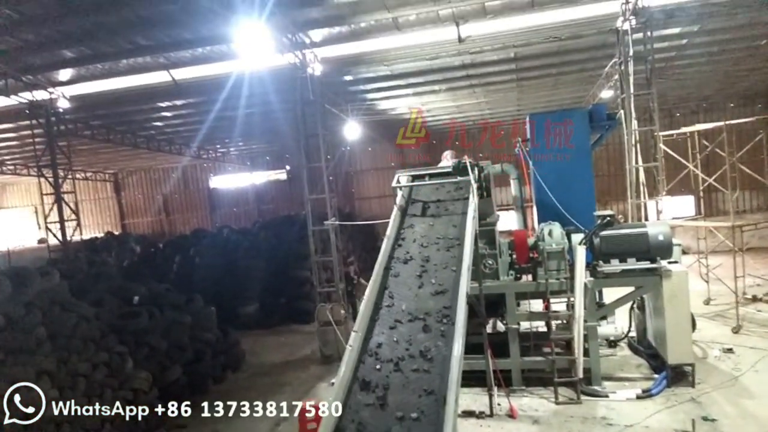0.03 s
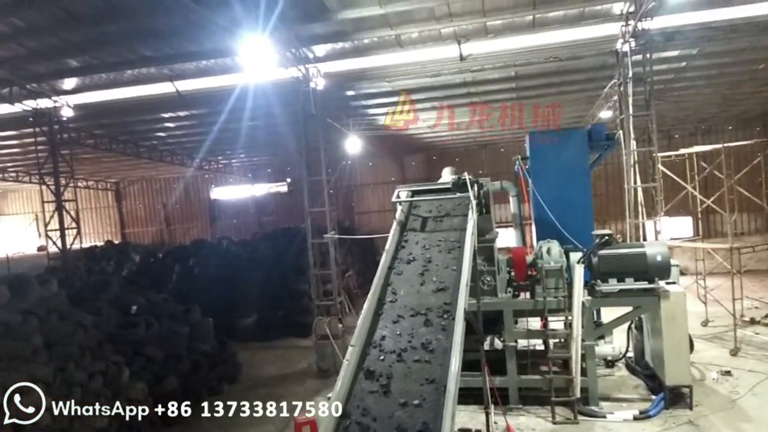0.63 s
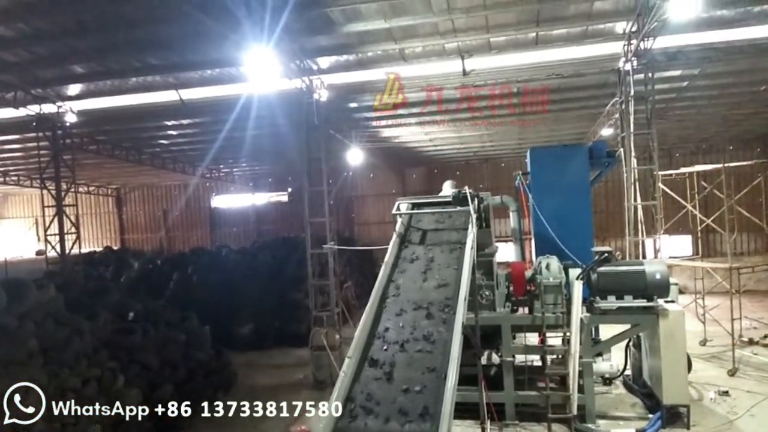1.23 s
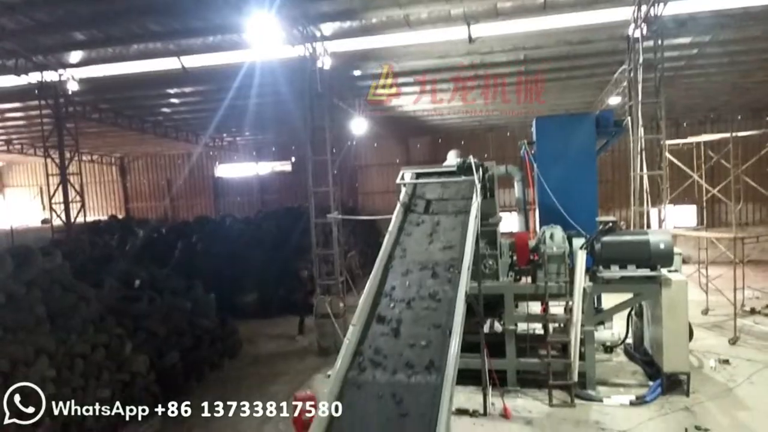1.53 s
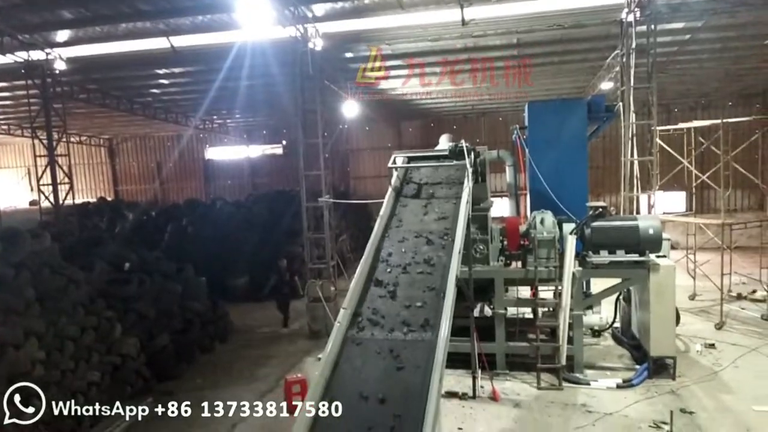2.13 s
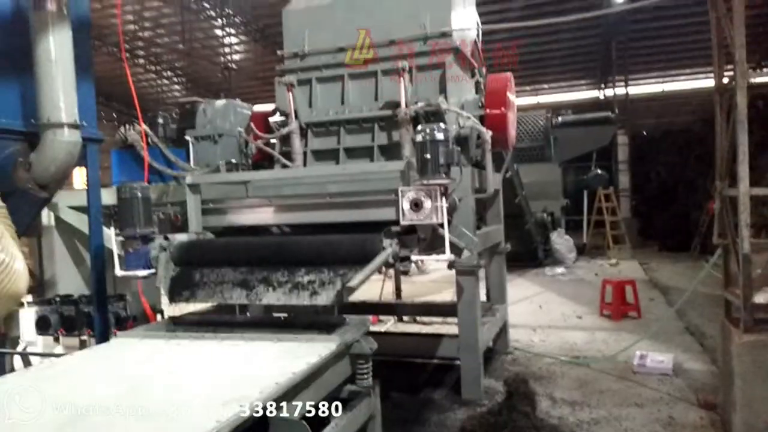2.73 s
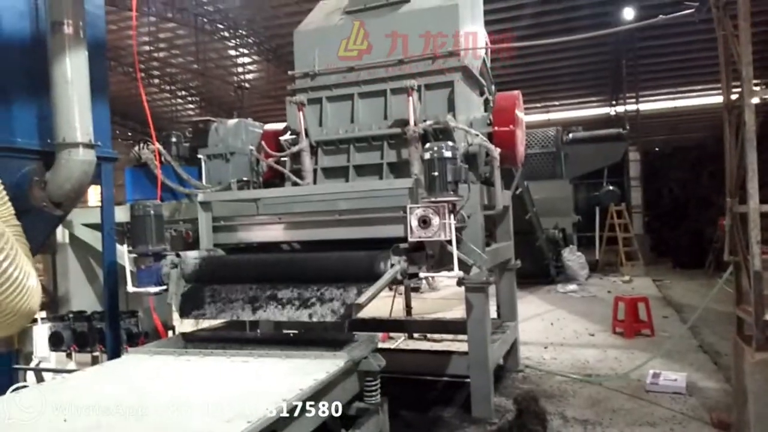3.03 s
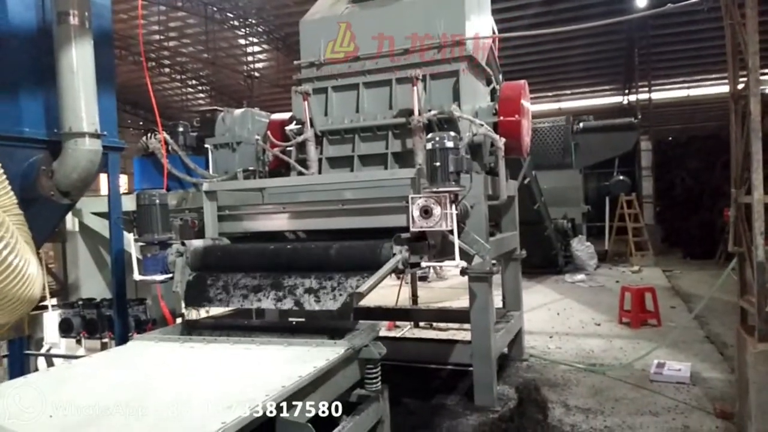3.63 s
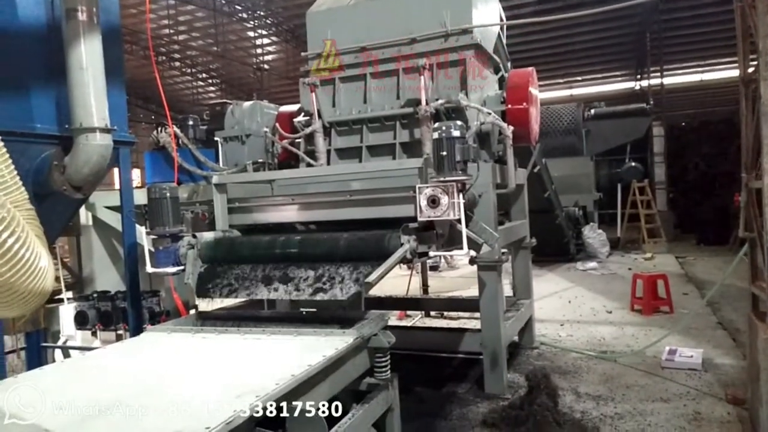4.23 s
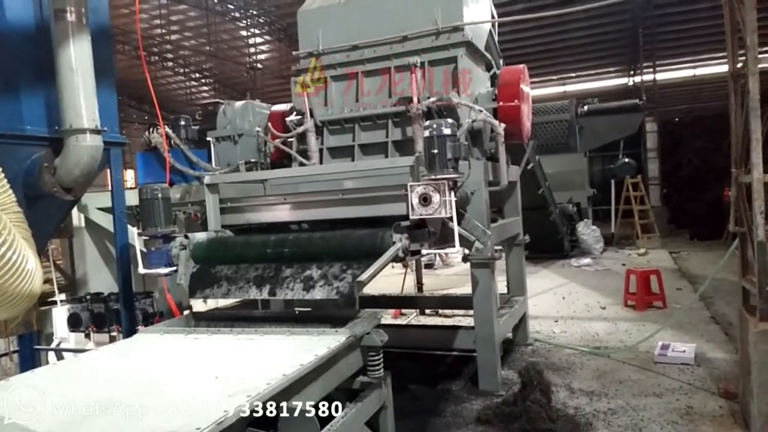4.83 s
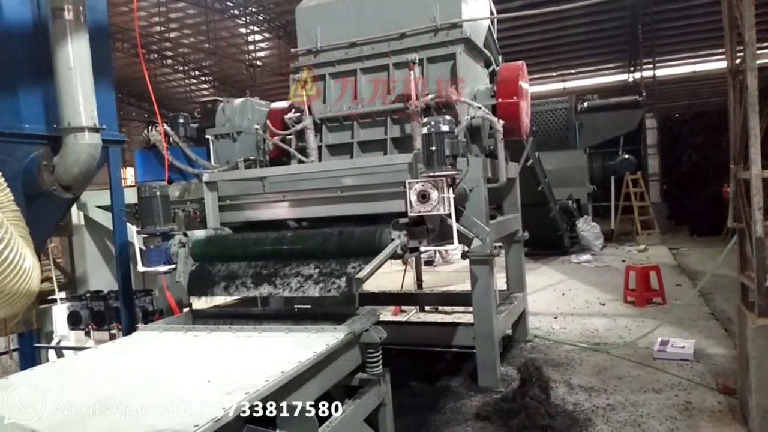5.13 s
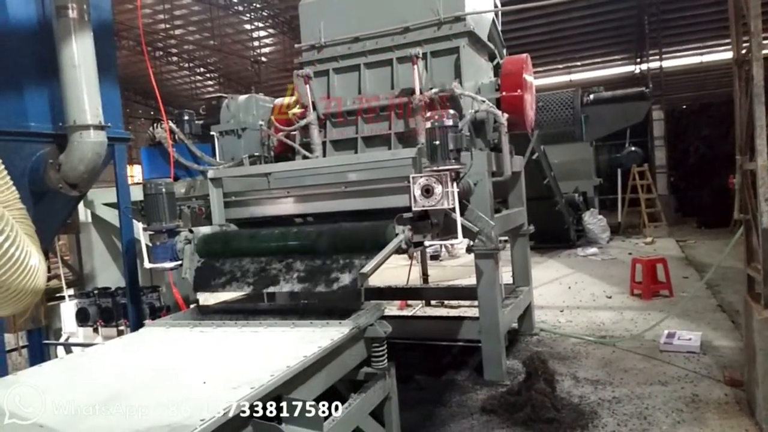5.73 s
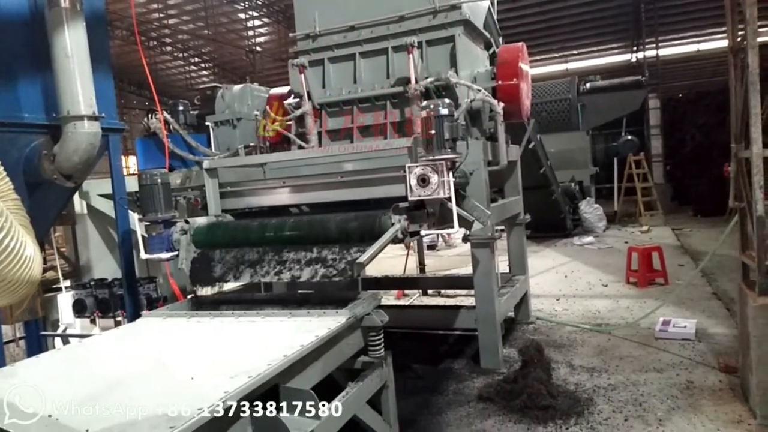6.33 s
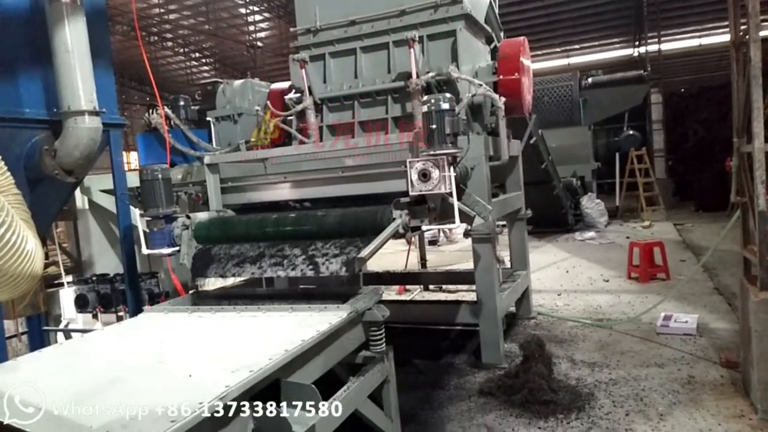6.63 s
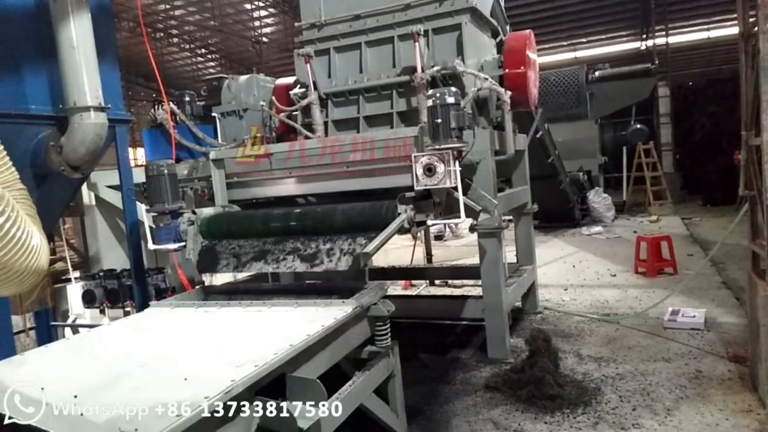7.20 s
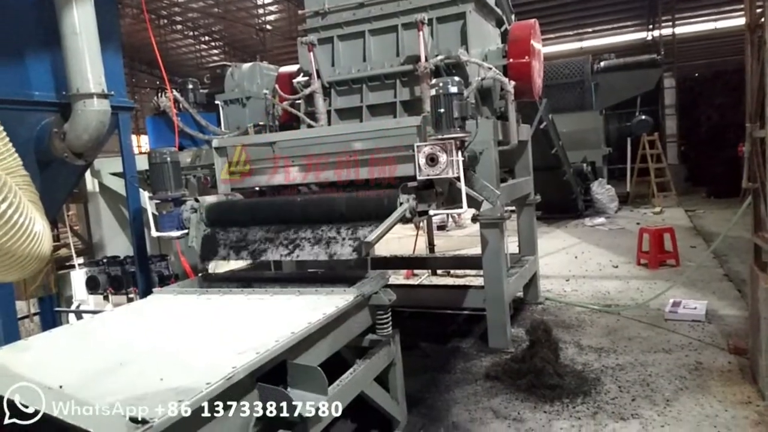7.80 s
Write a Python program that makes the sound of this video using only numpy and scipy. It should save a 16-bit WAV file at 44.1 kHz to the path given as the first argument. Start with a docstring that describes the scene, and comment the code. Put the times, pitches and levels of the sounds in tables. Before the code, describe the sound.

Heavy machinery shreds tires in a large metal shed. Beside the conveyor, a dense roar carries a throbbing hum and a steady fan and gear whine, with faint close rustles and two echoing metal clanks. The sound cuts to a brief silence, then fades back in at the granulator, where the roar continues with a deeper, pulsing hum and light ticks of crumbs hitting a screen.

```python
"""In a big sheet-metal shed a tyre-shredding line runs, heard first by the conveyor and then, after
a short silence and a fade-in, by the granulator. A three-knife rotor hums at harmonics of its shaft
and tears rubber, fed in surges: countless impacts merge into a roar that excites the modes of the
steel housings. A dust fan and gears whine, crumbs hiss and tick on the screen deck, short rustles
sound close by, and hard scraps clank on the chute and reverberate through the shed."""
import sys
import numpy as np
from scipy import signal
from scipy.fft import rfft, irfft
from scipy.io import wavfile

SR = 44100
rng = np.random.default_rng(int(sys.argv[2]) if len(sys.argv) > 2 else 0)


def generate_wav(sig):
    """Save sig (samples, or channels by samples) to the path in sys.argv[1] as 16-bit PCM at SR."""
    pcm = np.round(np.clip(np.atleast_2d(sig).T, -1, 1) * 32767).astype(np.int16)
    wavfile.write(sys.argv[1], SR, pcm)


N = 351036
T = np.arange(N) / SR
FREQ = np.arange(N // 2 + 1) * SR / N + 1e-3
SHAFT_HZ, KNIVES = 25.1, 3
CONVEYOR, GRANULATOR = 0, 1  # listening places


def undb(db):
    """Decibels to amplitude ratio."""
    return 10 ** (np.asarray(db) / 20)


def unit(x):
    """Normalisation to rms 1."""
    return x / np.sqrt(np.mean(x ** 2))


def shape(x, gain):
    """Linear filtering: a gain for every frequency."""
    return irfft(rfft(x, N) * gain, N)


def colour(points):
    """Spectral envelope through (frequency_hz, level_db) points."""
    hz, db = np.transpose(points)
    return undb(np.interp(np.log(FREQ), np.log(hz), db))


def resonance(hz, width_hz):
    """Response of a damped oscillator, gain 1 at its centre."""
    return 1 / (1 + 1j * (FREQ / hz - hz / FREQ) * hz / width_hz)


def wander(rate_hz):
    """Low-passed noise: a smooth drift of rms 1."""
    return unit(shape(rng.standard_normal(N), 1 / (1 + (FREQ / rate_hz) ** 2)))


def swell(crest_s, half_s):
    """Gaussian rise and fall."""
    return np.exp(-((T - crest_s) / half_s) ** 2 / 2)


def curve(points):
    """Linear interpolation of (time_s, value) points."""
    return np.interp(T, *np.transpose(points))


def cycle(rate_hz, crest_s):
    """Sinusoidal modulation between 1 and -1."""
    return np.cos(2 * np.pi * rate_hz * (T - crest_s))


def grains(per_s, spread_db):
    """Poisson impacts, a few much stronger than the rest."""
    hits = rng.random(N) < per_s / SR
    sizes = undb(spread_db * np.minimum(rng.exponential(size=N), 4))
    return unit(hits * sizes * rng.choice([-1, 1], N))


def patter(per_s, spread_db, ring_s):
    """Incoherent sum: each landing crumb adds a decaying burst of hiss."""
    energy = signal.lfilter([1], [1, -np.exp(-1 / (ring_s * SR))], grains(per_s, spread_db) ** 2)
    return unit(np.sqrt(energy) * rng.standard_normal(N))


def tone(phase, unsteady_share, width_hz):
    """Random modulation: changing load moves a share of a tone's power into sidebands."""
    phase = phase + rng.uniform(0, 2 * np.pi)
    band = abs(resonance(width_hz / 2, width_hz * 1.1)) / (1 + (FREQ / (2 * width_hz)) ** 2)
    in_phase, quadrature = (unit(shape(rng.standard_normal(N), band)) for _ in range(2))
    flutter = in_phase * np.cos(phase) + quadrature * np.sin(phase)
    return np.sqrt(2 * (1 - unsteady_share)) * np.cos(phase) + np.sqrt(unsteady_share) * flutter


def shed(x, wet_db, t60_s=1.6):
    """Reverberation: direct sound plus a diffuse tail whose treble dies first."""
    t = T[:int(t60_s * SR)]
    noise = rng.standard_normal(N)
    dull = shape(noise, 1 / (1 + (FREQ / 3000) ** 2))
    decay = np.exp(-np.log(1000) * t / t60_s)
    tail = (dull[:len(t)] * decay + (noise - dull)[:len(t)] * decay ** 2) * (t > .008)
    return x + undb(wet_db) * signal.fftconvolve(x, tail / np.linalg.norm(tail))[:N]


def panels(echo_db, count):
    """Comb filtering: short echoes off steel panels interfere in all but the bass."""
    delays_s = rng.uniform(.004, .035, count)
    echoes = sum(np.exp(-2j * np.pi * FREQ * s) for s in delays_s) / np.sqrt(count)
    return abs(1 + undb(echo_db) * echoes * FREQ / (FREQ + 400))


# soft rustles: crest_s, half_length_s, level_db
RUSTLE_SWELLS = [(0.267, .04, -44.5), (.57, 0.045, -49), (1.293, .028, -40.5), (1.455, .016, -47),
                 (1.681, .1, -52), (1.99, 0.027, -45.5), (2.32, 0.087, -43)]
# their spectrum: frequency_hz, level_db
RUSTLE_SPECTRUM = [(2000, -33), (4500, -3.5), (6800, -9.5), (8500, -23), (10000, -31.5), (12000, -25),
                   (15500, -23)]
# scrapes and chinks: crest_s, half_length_s, pitch_hz, width_hz, level_db
SCRAPE_SWELLS = [(.135, .025, 6200, 600, -47), (.18, .005, 8740, 400, -55), (.199, .004, 8700, 400, -58),
                 (0.268, .03, 5600, 2000, -36.5), (0.362, .025, 6000, 900, -42),
                 (.43, .028, 7050, 1000, -46.5)]


def rustles():
    """Band-limited noise in brief swells: bright rustles, scrapes and chinks close by."""
    envelope = sum(undb(db) * swell(s, half_s) for s, half_s, db in RUSTLE_SWELLS)
    scrapes = np.zeros(N)
    for crest_s, half_s, hz, width_hz, db in SCRAPE_SWELLS:
        band = unit(shape(rng.standard_normal(N), resonance(hz, width_hz) ** 2))
        scrapes += undb(db) * swell(crest_s, half_s) * band
    hiss = unit(shape(patter(per_s=4000, spread_db=3, ring_s=.003), colour(RUSTLE_SPECTRUM)))
    return envelope * hiss + scrapes


# scraps striking the chute, crumbs striking the screen deck: start_s, level_db
CHUTE_HITS = [(1.584, -22), (2.134, -29)]
DECK_HITS = [(2.904, -31), (3.139, -30), (3.278, -33.5), (3.336, -31.5), (3.465, -35), (3.771, -32),
             (4.169, -31), (4.292, -33), (4.362, -35.5), (5.080, -28.5), (5.368, -33.5), (5.398, -31),
             (5.825, -33), (6.045, -29), (7.001, -31), (7.128, -30), (7.316, -33)]
# modes of chute and deck: pitch_hz, width_hz, level_db
CHUTE_MODES = [(2164, 110, 7), (2840, 260, 0), (3650, 300, -18), (5130, 140, -13)]
DECK_MODES = [(3920, 700, -6.5), (5020, 500, 1.5)]


def struck_steel(hits, modes, t60_s, wet_db):
    """Modal excitation: each piece rattles briefly against the steel and rings it."""
    force = sum(undb(db) * (T >= s) * np.exp(-np.log(1000) * abs(T - s) / t60_s) for s, db in hits)
    steel = sum(undb(db) * resonance(hz, width_hz) for hz, width_hz, db in modes)
    response = unit(abs(steel) / (1 + (FREQ / 6500) ** 10))
    return shed(shape(force * rng.standard_normal(N), response), wet_db)


# fan and gearbox tones: pitch_hz, level_db, unsteady_share, width_hz
CONVEYOR_TONES = [(253.5, -28.5, .3, 4), (266, -30.5, .3, 4), (549.3, -31, .15, 4), (699.8, -28.5, .15, 6),
                  (725.2, -18.3, .04, 16), (775, -36, .3, 6), (1206, -32.5, .65, 6), (1464, -36, .6, 7),
                  (1701, -39.5, .5, 6), (2160, -42, .6, 8)]
GRANULATOR_TONES = [(723.5, -29.5, .65, 6), (748, -36, .9, 10), (861, -37, .9, 8), (1694.5, -39, .55, 5),
                    (2161, -41, .8, 8)]


def whines(tones):
    """Periodic forcing: fan blades and gear teeth each radiate their own pitch."""
    return sum(undb(db) * tone(2 * np.pi * hz * T, share, width_hz) for hz, db, share, width_hz in tones)


# rotor harmonics: shaft_multiple, conveyor_db, granulator_db, unsteady_share
HARMONICS = [(1, -70, -47, .1), (2, -44, -44.5, 0.1), (3, -49.5, -28, 0.01), (9, -33.5, -21.5, 0.11),
             (12, -27, -22, 0.05), (15, -38, -40.5, 0.4), (21, -42, -32.5, .12)]
# main harmonic by the conveyor: time_s, level_db
CONVEYOR_THROB = [(.05, -21), (.4, -23.5), (.62, -19.5), (.85, -23.5), (1.17, -18), (1.54, -31.5),
                  (1.69, -15.5), (1.96, -22.5), (2.35, -21.5)]


def rotor_hum(shaft_phase, place, main_db, main_unsteady, width_hz):
    """Harmonic series of the shaft; the main line, at twice the knife rate, throbs."""
    hum = undb(main_db) * tone(2 * KNIVES * shaft_phase, main_unsteady, width_hz=7.5)
    for multiple, *levels_db, share in HARMONICS:
        hum += undb(levels_db[place]) * tone(multiple * shaft_phase, share, width_hz)
    return hum


# surges of feed: rate_hz, crest_s, depth_db
CONVEYOR_FEED = [(.74, .21, .55), (3.04, .248, .6)]
GRANULATOR_FEED = [(.72, 3.86, .4), (1.47, 3.506, .5)]
# big lumps of rubber: crest_s, half_length_s, boost_db
RUBBER_LUMPS = [(3.47, .04, 0), (5.35, 0.086, 1.3), (7.002, 0.032, 0.5), (7.58, 0.057, 1)]


def knife_load(feed, wander_db):
    """Slow amplitude modulation, in dB: surges, lumps and chance vary the load on the knives."""
    surges_db = sum(db * cycle(rate_hz, crest_s) for rate_hz, crest_s, db in feed)
    lumps_db = sum(db * swell(crest_s, half_s) for crest_s, half_s, db in RUBBER_LUMPS)
    return surges_db + lumps_db + wander_db * wander(4)


# spectrum of the roar: frequency_hz, level_db
CONVEYOR_SPECTRUM = [(25, -31.5), (60, -14), (110, -1.5), (280, 3), (500, -3), (800, -4), (1600, -8.5),
                     (2350, -10.5), (3700, -24.5), (5400, -24), (7400, -34.5), (9700, -57.5), (12000, -54),
                     (15500, -58)]
GRANULATOR_SPECTRUM = [(25, -31.5), (72, -15.5), (130, -3), (250, 4.5), (450, -3), (900, -5), (1700, -7),
                       (2450, -10), (3700, -25.5), (5500, -29.5), (7900, -47.5), (9800, -62.5),
                       (13500, -62.5), (15500, -55)]
# steel housings, relative to the roar: pitch_hz, width_hz, conveyor_db, granulator_db
HOUSING_MODES = [(108, 10, -4, 9.5), (724.5, 46, 5, 8), (850, 10, -9.5, 5.5), (1200, 26, 8.5, -2.5),
                 (1440, 43, 10, 1), (1680, 13, 2.5, -1), (2152, 36, -5, 3)]
# crumb hiss by the conveyor, before the load is added: time_s, level_db
CRUMB_HISS = [(.05, -40.5), (.3, -39), (.95, -43.3), (1.35, -44), (1.8, -41.5), (2.1, -44), (2.35, -40.7)]


def shredding(shaft_phase, place, roar_db, hiss_db, turn_depth, chop_depth, crumbs_per_s, spread_db):
    """Shot noise: rubber tears at each turn and knife, ringing the housings; crumbs hiss above it."""
    spectrum = colour((CONVEYOR_SPECTRUM, GRANULATOR_SPECTRUM)[place])
    modal_power = sum(abs(undb(levels_db[place]) * resonance(hz, width_hz)) ** 2
                      for hz, width_hz, *levels_db in HOUSING_MODES)
    body = spectrum * np.sqrt(1 + modal_power) * panels(echo_db=-14.5, count=8)
    low_share = 1 / (1 + (FREQ / 3200) ** 10)
    pulsing = 1 + turn_depth * np.cos(shaft_phase) + chop_depth * np.cos(KNIVES * shaft_phase)
    tears = grains(per_s=14000, spread_db=1.8) * pulsing * undb(.5 * wander(22))
    roar = shape(tears, body * np.sqrt(low_share))
    hiss = shape(patter(crumbs_per_s, spread_db, ring_s=.007), body * np.sqrt(1 - low_share))
    # each level refers to one band of its layer
    roar /= np.std(shape(roar, (FREQ > 900) & (FREQ < 3000)))
    hiss /= np.std(shape(hiss, (FREQ > 3500) & (FREQ < 9000)))
    return roar * undb(roar_db) + hiss * undb(hiss_db)


def by_conveyor(shaft_phase):
    """Superposition beside the belt: whines, clanks and rustles over roar and hum."""
    load_db = knife_load(CONVEYOR_FEED, wander_db=.15)
    roar = shredding(shaft_phase, CONVEYOR, roar_db=-20.3 + load_db, hiss_db=curve(CRUMB_HISS) + load_db,
                     turn_depth=.059, chop_depth=.032, crumbs_per_s=6600, spread_db=6.5)
    hum = rotor_hum(shaft_phase, CONVEYOR, curve(CONVEYOR_THROB), main_unsteady=.12, width_hz=5.3)
    whine = whines(CONVEYOR_TONES)
    clanks = struck_steel(CHUTE_HITS, CHUTE_MODES, t60_s=.44, wet_db=-2)
    return roar + hum + whine + clanks + rustles()


def by_granulator(shaft_phase):
    """Superposition in front of the rotor: whines and ticks over roar and a deep beating hum."""
    load_db = knife_load(GRANULATOR_FEED, wander_db=.32)
    roar = shredding(shaft_phase, GRANULATOR, roar_db=-20.5 + load_db, hiss_db=-37 + load_db,
                     turn_depth=.026, chop_depth=.081, crumbs_per_s=2300, spread_db=3.5)
    beating_db = -22.5 + 1.5 * cycle(rate_hz=3.16, crest_s=3.015)
    hum = rotor_hum(shaft_phase, GRANULATOR, beating_db, main_unsteady=.14, width_hz=6.3)
    ticks = struck_steel(DECK_HITS, DECK_MODES, t60_s=.07, wet_db=-9)
    return roar + hum + whines(GRANULATOR_TONES) + ticks


def scene():
    """One slightly drifting shaft heard from two places, with a short silence between them."""
    shaft_phase = 2 * np.pi * np.cumsum(SHAFT_HZ * (1 + .00039 * wander(.31))) / SR
    cut_s, fade_from_s, fade_to_s = 2.437, 2.587, 2.791
    cut_off = np.clip((cut_s - T) / .0068, 0, 1)
    fade_in = np.clip((T - fade_from_s) / (fade_to_s - fade_from_s), 0, 1) ** 2.77
    return (by_conveyor(shaft_phase) * cut_off + by_granulator(shaft_phase) * fade_in)[None]


def record(dry):
    """Soft saturation rounds the highest peaks; a low-pass filter cuts the top."""
    ceiling, top_hz = .92, 15600
    rounded = dry / (1 + (dry / ceiling) ** 12) ** (1 / 12)
    return signal.sosfilt(signal.ellip(10, .2, 80, top_hz, fs=SR, output="sos"), rounded)


dry = scene()
out = record(dry)
generate_wav(out)
```